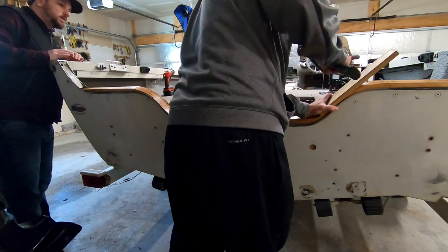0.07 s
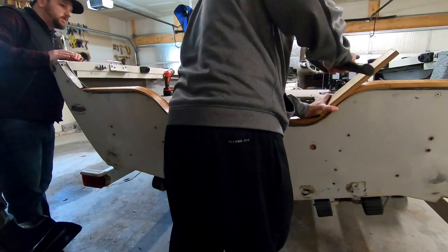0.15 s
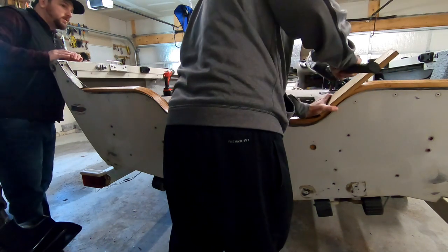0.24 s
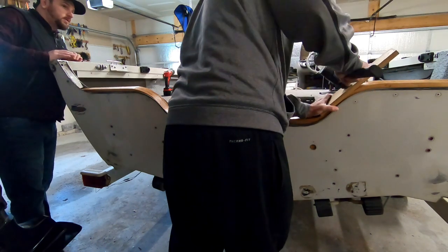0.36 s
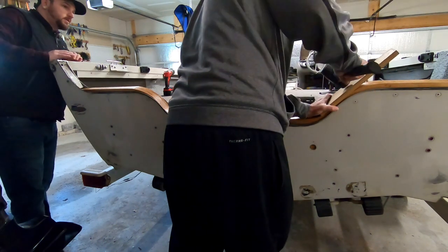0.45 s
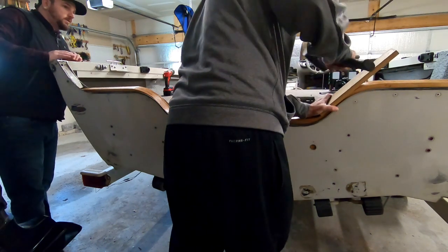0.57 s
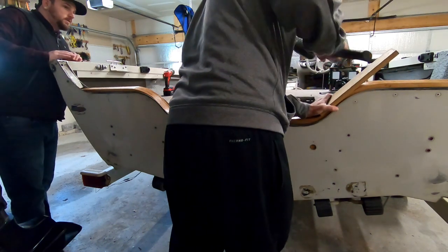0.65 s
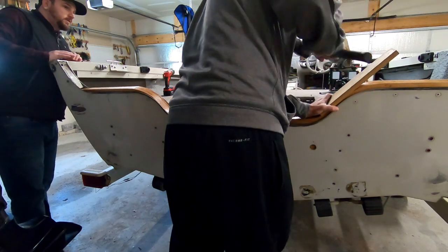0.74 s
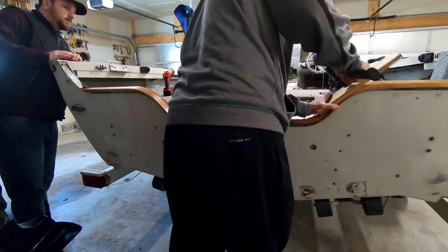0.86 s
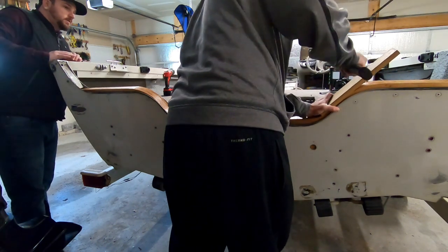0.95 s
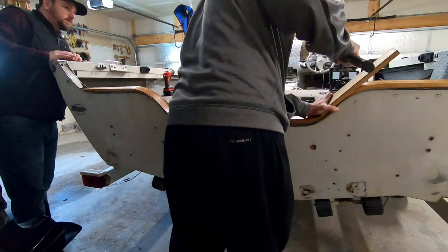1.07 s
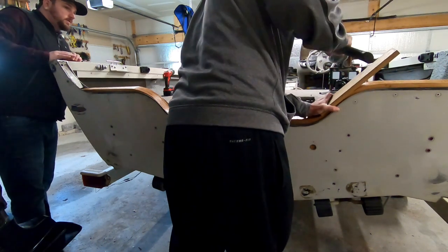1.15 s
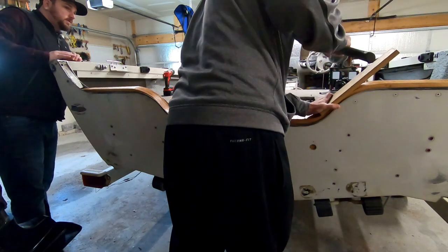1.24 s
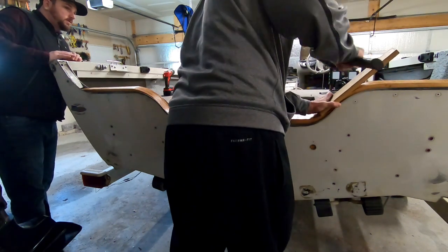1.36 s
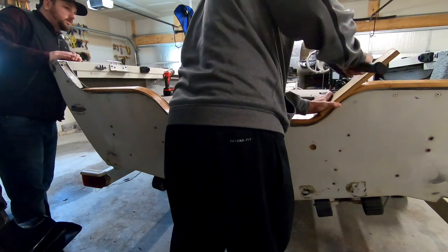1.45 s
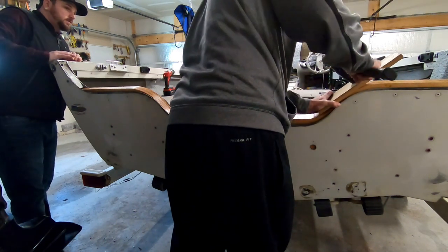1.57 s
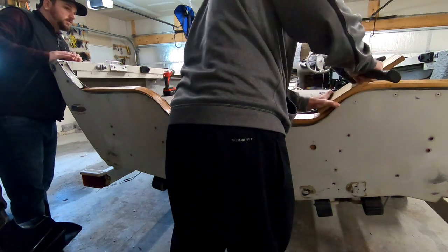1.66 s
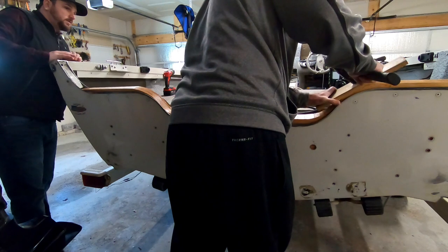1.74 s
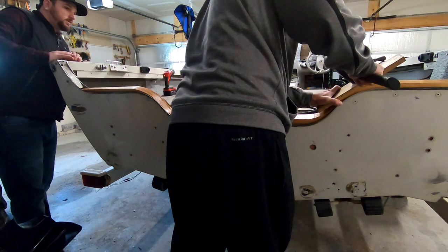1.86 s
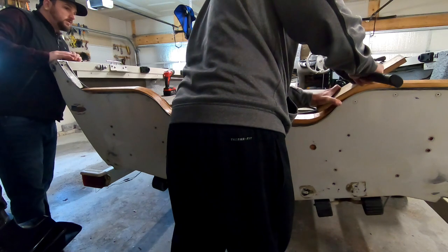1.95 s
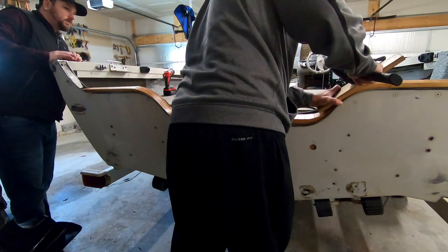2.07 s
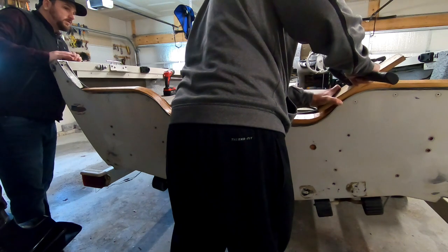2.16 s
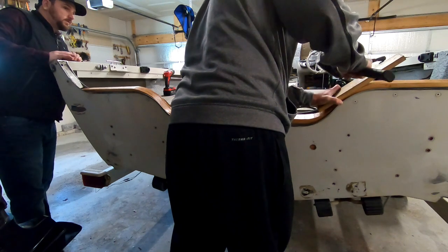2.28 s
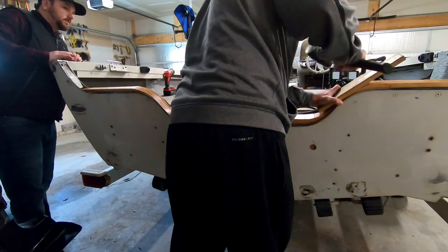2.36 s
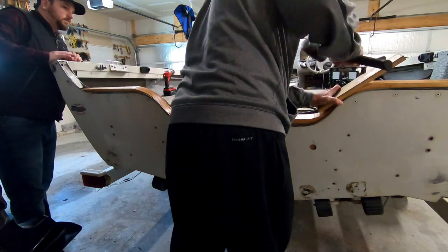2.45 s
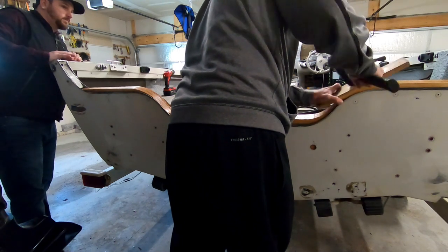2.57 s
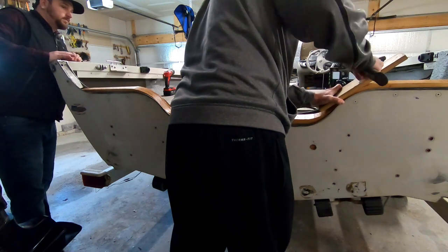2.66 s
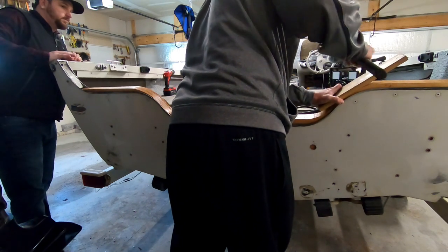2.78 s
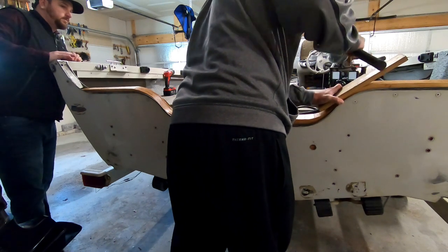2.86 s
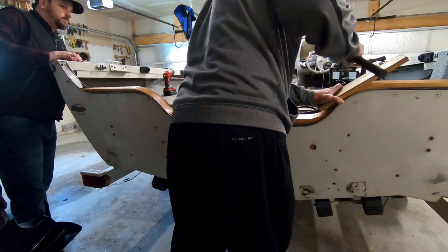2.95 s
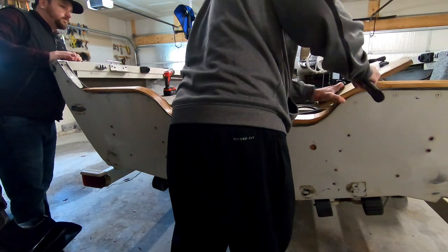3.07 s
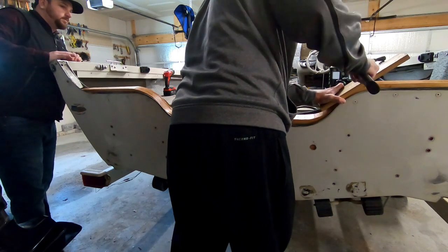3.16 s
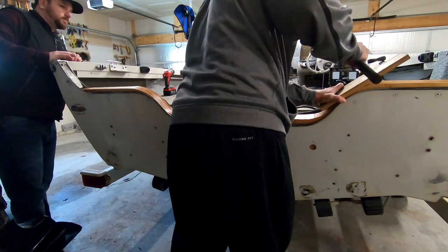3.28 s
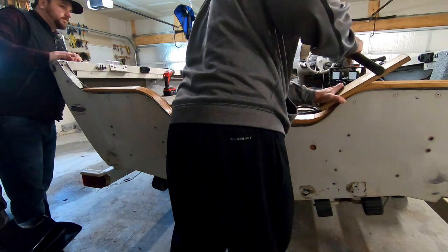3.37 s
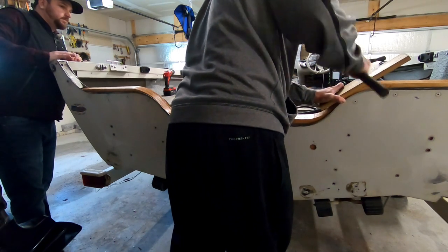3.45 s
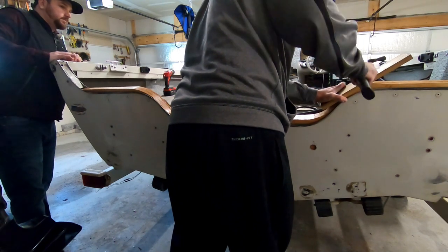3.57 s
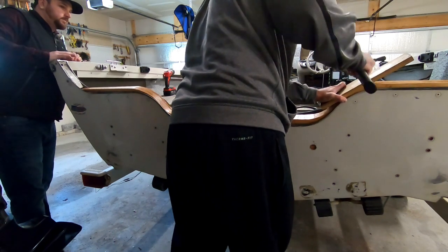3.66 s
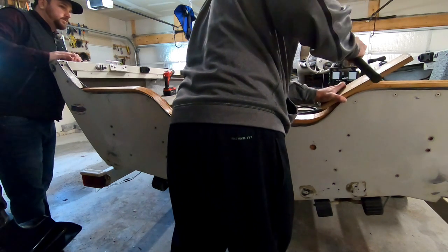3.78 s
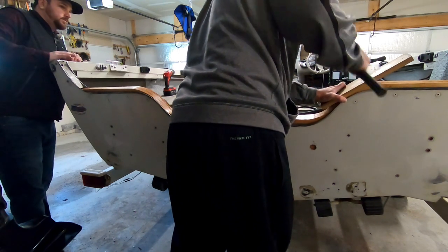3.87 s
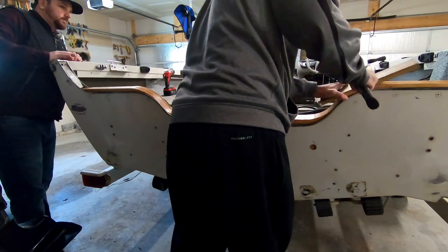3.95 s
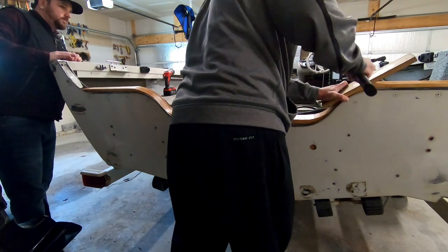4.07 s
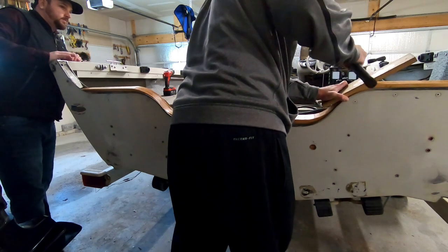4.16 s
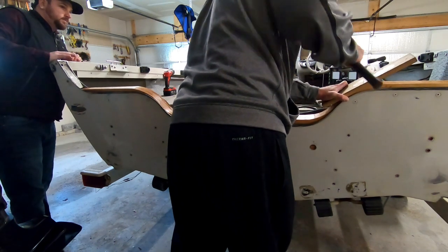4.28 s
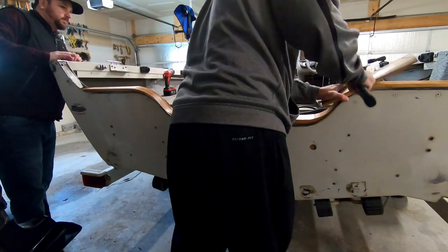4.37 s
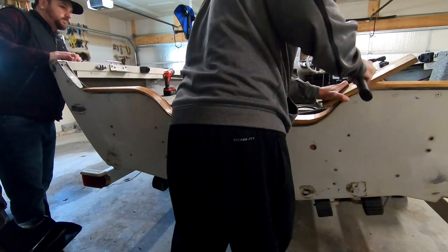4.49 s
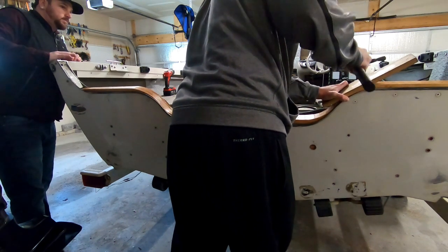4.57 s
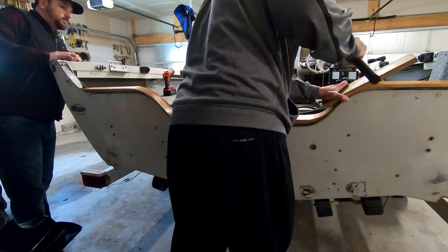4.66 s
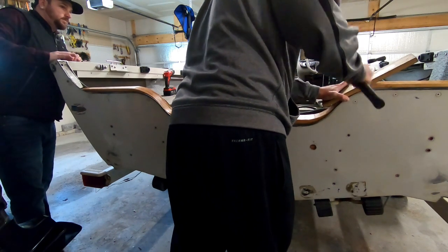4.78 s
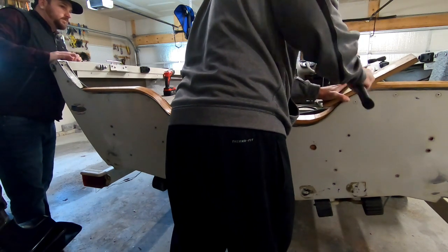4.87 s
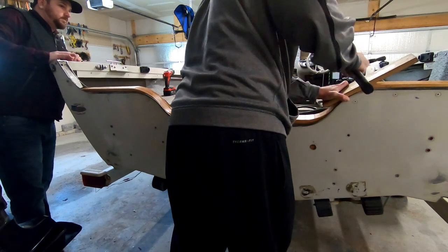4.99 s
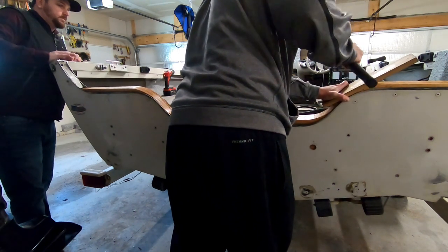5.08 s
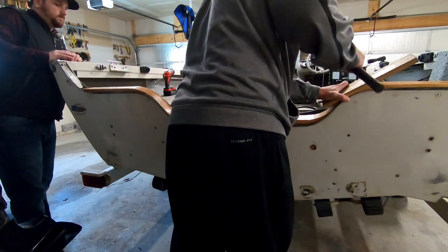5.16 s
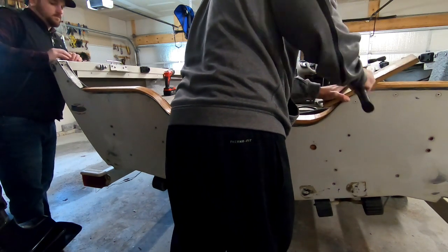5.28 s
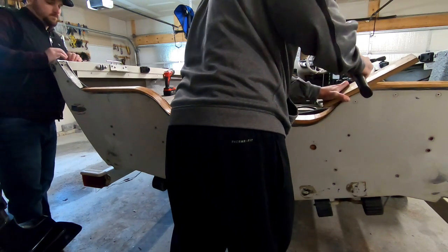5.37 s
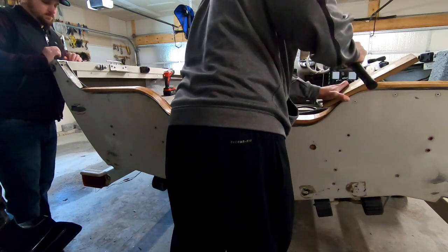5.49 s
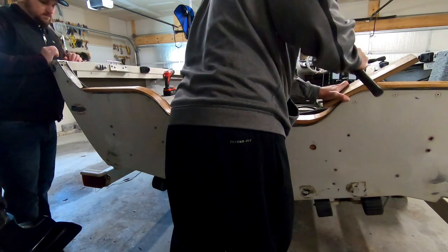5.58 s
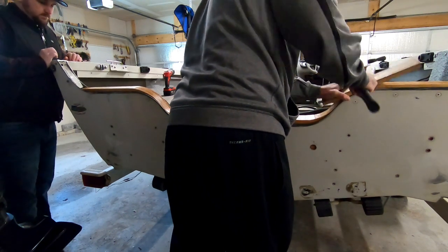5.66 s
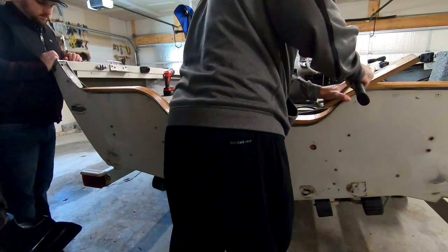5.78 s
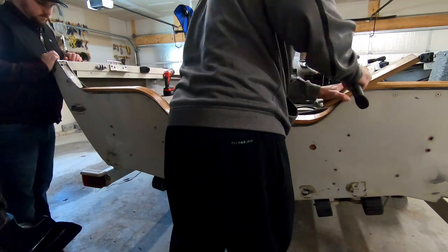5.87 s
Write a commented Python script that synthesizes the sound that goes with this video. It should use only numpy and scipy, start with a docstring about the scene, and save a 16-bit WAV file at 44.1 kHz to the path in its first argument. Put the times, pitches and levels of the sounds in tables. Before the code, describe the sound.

Loud close hammering on wood against a metal boat hull, ringing brightly at first, then turning to shorter, hollow knocks as the board seats.

```python
"""Hammer blows crack, boom and ring: plywood tapped into an aluminium boat hull in a garage, trial blows, then eight in rhythm.
Contact noise drives the board's resonances, sines make hull and thud, decaying noise bands make the clatter and the room.
As the board finally seats, its bright ring gives way to a shorter, hollow knock; small ticks, rubs and faint hiss join in.
The close microphone overloads on loud peaks; its gain control ducks, then lets the ringing swell over a faint rumble.
Early on the sound cuts out for a moment and returns with a dull thump."""
import sys
import numpy as np
from scipy import signal
from scipy.fft import rfft, irfft
from scipy.io import wavfile
from scipy.ndimage import uniform_filter1d, minimum_filter1d

SR = 44100
rng = np.random.default_rng(int(sys.argv[2]) if len(sys.argv) > 2 else 0)


def int16_out(signal):
    """Quantize to a 16-bit WAV file."""
    q = np.round(np.clip(np.atleast_2d(signal).T, -1, 1) * 32767)
    wavfile.write(sys.argv[1], SR, q.astype(np.int16))


N = 261513
TIME = np.arange(N) / SR
AGE = TIME[:int(1.3 * SR)]  # seconds since a blow or tick
BAND_HZ = 28 * 2 ** np.arange(0, 9.5, .5)  # half-octave centres


def undb(db):
    """Decibels to gain."""
    return 10 ** (np.asarray(db) / 20)


def fade(t60):
    """Exponential decay, 60 dB down after t60 seconds."""
    return np.exp(-np.log(1000) * AGE / max(t60, 1e-3))


def resonate(x, hz, width):
    """Two-pole resonance with gain 1 at its centre; centre and width in Hz are capped."""
    centre = min(hz, SR / 3)
    b, a = signal.iirpeak(centre, hz / min(width, SR / 4), fs=SR)
    return signal.lfilter(b, a, x)


def cut(x, hz, kind, order=2):
    """Butterworth low-pass or high-pass."""
    sos = signal.butter(order, min(hz, SR / 2 - 1), kind, fs=SR, output="sos")
    return signal.sosfilt(sos, x)


def band_noise(hz, size):
    """Half an octave of noise with soft edges, rms 1."""
    bin_hz = (np.arange(size // 2 + 1) + 1e-6) * SR / size
    octaves = np.log2(bin_hz / hz)
    window = np.cos(np.pi * np.clip(octaves, -.5, .5))
    x = irfft(rfft(rng.standard_normal(size)) * window, size)
    return x / x.std()


def bands(table):
    """Rows of a spectrum table read at every half octave, interpolated over log frequency."""
    hz, *columns = np.transpose(table)
    return zip(BAND_HZ, *(np.interp(np.log(BAND_HZ), np.log(hz), c) for c in columns))


def add(out, s, x):
    """Mix x into out from time s; whatever falls outside is dropped."""
    start = int(round(s * SR))
    x = x[max(-start, 0):max(len(out) - start, 0)]
    out[max(start, 0):max(start, 0) + len(x)] += x


def modes(table):
    """Decaying sines struck together; neighbours swing in opposite directions."""
    total = 0
    for k, (hz, db, t60) in enumerate(table):
        total = total + (-1) ** k * undb(db) * fade(t60) * np.sin(2 * np.pi * hz * AGE)
    return total


def dense_ring():
    """Countless panel modes and wall echoes: a quick loud clatter, and the slow decay of the garage."""
    # The dense ringing of boat and garage, before any damping by the board.
    # Each row: frequency in Hz, early level in dB, late level in dB, late t60 in seconds.
    ring_spectrum = [(40.5, -32, -21.5, 1.0), (101, 0, -18.5, 0.41), (219, -2, -21.5, 0.72),
                     (350, -2.5, -21, 0.9), (515, -10, -26.5, 0.87), (1020, -1, -21.5, 0.73),
                     (2240, -13, -25, 0.78), (3730, -15, -30, 0.7), (7560, -18.5, -35, 0.45),
                     (13760, -20.5, -37, 0.26)]
    early_t60_s = 0.11
    early, late = 0, 0
    for hz, early_db, late_db, t60 in bands(ring_spectrum):
        band = band_noise(hz, len(AGE))
        early = early + undb(early_db) * fade(early_t60_s) * band
        late = late + undb(late_db) * fade(t60) * band
    return np.array([early, late])


def seated(s, loose_and_seated):
    """A property of the board at time s, placed between its loose and seated values."""
    # How firmly the board is held, first by hand, then by the hull as the run of blows seats it.
    # Each row: time in seconds, firmness from 0 (loose) to 1 (seated).
    firmness = [(.43, 0.31), (1.0, 0.21), (2.7, 0.017), (3.2, 0.17), (5.0, 0.85)]
    held = np.interp(s, *np.transpose(firmness))
    return np.interp(held, (0, 1), loose_and_seated)


def hammer(wander_hz=1000, crack_hz=2300, crack_width_hz=2400, grit_db=-24):
    """Every blow drives the same boat and room; contact hardness and the seating of the board colour it."""
    # Hammer blows; the first starts before time zero, so only its later part is heard.
    # Each row: start in seconds, strength in dB, contact corner in Hz (higher = harder),
    # extra crack level in dB, tail level in dB.
    blows = [(-.18, -1.5, 1020, 10, -7.5), (0.432, -7, 887, 14, 5.5), (0.9893, -3, 4800, 4, -1),
             (1.682, -7.5, 960, -10.5, -11.5), (2.7011, -6.5, 5770, 7.5, -1.5), (3.1683, -6, 4100, 5.5, -2),
             (3.628, -6, 6240, 1, -1), (4.059, -4.5, 6800, -3.5, -2), (4.5070, -7.5, 6200, 6, 0),
             (4.9496, -8, 4600, 1, -2), (5.3781, -9, 4100, 1, -2.5), (5.7937, -10, 4950, 0, 0.5)]
    # Plywood resonances. Each row: frequency in Hz before the pitch ratio, width in Hz,
    # relative level in dB.
    board_modes = [(1560, 270, 6), (2938, 330, 5.5), (3640, 210, -1), (4840, 330, -7)]
    # The hollow knock. Each row: frequency in Hz, width in Hz, relative level in dB.
    knock_modes = [(468.4, 70, 1.5), (706, 99, 4), (3300, 380, -4)]
    # Hull panel modes. Each row: frequency in Hz, relative level in dB, t60 in seconds before damping.
    hull_modes = [(36.1, -36, 0.4), (54.07, -22.5, 0.8), (89.66, -19, 0.8), (112.6, -23.5, 0.93),
                  (136, -13.5, 0.21), (164.8, -5, 0.34), (178.6, -6.5, .46), (219, -11.5, 0.43),
                  (268.7, -16.5, 0.54), (348, -16, 0.51), (374.2, -17.5, 0.63), (417.5, -15.5, 0.58),
                  (487.7, -12, 0.34)]
    # The heavy thud of board against hull.
    # Each row: frequency in Hz, relative level in dB, t60 in seconds before damping.
    thud_modes = [(135.3, 6, 0.12), (175.9, 4.5, .16), (215.9, 2, 0.16), (353, -2.5, 0.15),
                  (443.3, -6.5, 0.038), (501.3, -0.5, 0.097)]
    # what seating changes: (loose, seated)
    board_pitch = (1.046, 0.962)  # ratio
    board_db, knock_db = (-0.5, -11.5), (-18, 8)  # free plywood ring, hollow knock
    damping_db_per_s = (-7, 20.5)  # joined by the linger damping, the sum never below 0
    build_s = (0.042, 0.004)  # time for the tail to spread through hull and room
    # a soft blow lingers on the board and damps it, in proportion to its contact time
    linger_db_per_s, linger_hz = 11.5, 1070  # damping at this contact corner
    crack_t60_s, base_crack_db = 0.0079, 21
    # the low boom swells once more
    surge_delay_s, surge_rise_s, surge_db, surge_top_hz = 0.098, 0.019, -6.5, 562

    out, ring = np.zeros(N), dense_ring()
    hull, thud = modes(hull_modes), modes(thud_modes)
    for s, db, contact_hz, crack_db, tail_db in blows:
        pitch = seated(s, board_pitch)
        damping = seated(s, damping_db_per_s) + linger_db_per_s * linger_hz / contact_hz
        # the head never lands on quite the same spot: long waves repeat, short ones differ
        early, late = cut(ring, wander_hz, "low") + cut(dense_ring(), wander_hz, "high")
        # the first crack comes straight from the board
        crack_noise = resonate(rng.standard_normal(len(AGE)), crack_hz * pitch, crack_width_hz)
        crack = fade(crack_t60_s) * crack_noise
        tail = late * (1 - np.exp(-AGE / max(seated(s, build_s), 1e-3)))
        body = undb(base_crack_db + crack_db) * crack + early + undb(tail_db) * tail
        board = sum(undb(mode_db) * resonate(body, hz * pitch, width) for hz, width, mode_db in board_modes)
        knock = sum(undb(mode_db) * resonate(body + thud, hz, width) for hz, width, mode_db in knock_modes)
        blow = body + thud + undb(min(tail_db, 0)) * hull
        blow = blow + undb(seated(s, board_db)) * board + undb(seated(s, knock_db)) * knock
        surge = cut(early, surge_top_hz, "low", order=4) * (1 - np.exp(-AGE / surge_rise_s))
        add(blow, surge_delay_s, undb(tail_db + surge_db) * surge)
        # a softer contact lasts longer and leaves the treble out, all but a little from the rough wood grain
        blow = cut(blow, contact_hz, "low") - undb(grit_db) * blow
        add(out, s, undb(db - max(damping, 0) * AGE) * blow)
    return out


def ticks_and_rubs(rough=0.28):
    """Filtered noise: small decaying ticks, grainy rubs and faint steady hiss."""
    # Small ticks. Each row: start in seconds, level in dB before gain control,
    # centre in Hz, width in Hz, t60 in seconds.
    ticks = [(2.182, -61.5, 254, 119.2, 0.21), (2.623, -62.5, 6500, 7000, 0.021)]
    # Rubs and faint hisses, some running on under the blows. Each row: start in seconds, end in seconds,
    # level in dB before gain control, centre in Hz, width in Hz of each of two filter passes (capped).
    rubs = [(-.1, 0.43, -72.5, 4170, 12000), (0.26, 0.45, -55, 1900, 2000), (-.1, 0.948, -71.5, 4170, 1800),
            (0.51, 2.1, -82, 3500, 3700), (1.84, 1.926, -76.5, 4600, 6000)]
    out = np.zeros(N)
    for s, db, hz, width, t60 in ticks:
        tick = resonate(rng.standard_normal(len(AGE)), hz, width)
        add(out, s, undb(db) * fade(t60) * tick / tick.std())
    for start, end, db, hz, width in rubs:
        # a random level for every 128 samples makes the grain
        grain_level = np.repeat(rng.standard_normal(N // 128 + 1), 128)[:N]
        grains = rng.standard_normal(N) * np.exp(rough * grain_level)
        rub = resonate(resonate(grains, hz, width), hz, width)
        span = uniform_filter1d(1. * ((TIME > start) & (TIME < end)), size=1800)
        out += undb(db) * rub / rub.std() * span
    return out


def garage():
    """A faint, rumbling background of steady noise bands."""
    # Garage background. Each row: frequency in Hz, level in dB a half octave before gain control.
    floor_spectrum = [(25, -64), (55, -69.5), (110, -71.5), (400, -83), (900, -82), (2000, -86),
                      (5000, -90), (15000, -94)]
    return sum(undb(db) * band_noise(hz, N) for hz, db in bands(floor_spectrum))


def scene():
    """Blows, ticks, rubs and background at one microphone."""
    return (hammer() + ticks_and_rubs() + garage())[None]


def gain_control(x, rest_db=12, hold_s=0.011, release_db_per_s=150):
    """Looks a little ahead, ducks on a peak, holds, then climbs back at a steady rate."""
    ceiling_db, attack_s, ahead = -7.3, .0052, int(.008 * SR)
    peak_db = 20 * np.log10(np.abs(np.pad(x[ahead:], (0, ahead))) + 1e-9)
    duck_db = np.maximum(peak_db + rest_db - ceiling_db, 0)
    half = int(hold_s * SR / 2)
    held_db = -minimum_filter1d(-duck_db, 2 * half + 1, origin=half)
    climb_db = release_db_per_s * TIME
    released_db = np.maximum.accumulate(held_db + climb_db) - climb_db
    smooth_duck_db = cut(released_db, 1 / (2 * np.pi * attack_s), "low", order=1)
    return x * undb(rest_db - smooth_duck_db)


def dropout(x, thump_db=-7, thump_width_s=0.0023):
    """The sound cuts out for a moment and comes back with a dull thump, a high-passed bell-shaped pulse."""
    gap_from_s, gap_to_s, thump_at_s = 1.049, 1.074, 1.0755
    live = 1 - uniform_filter1d(1. * ((TIME > gap_from_s) & (TIME < gap_to_s)), size=100)
    thump = undb(thump_db) * np.exp(-((TIME - thump_at_s) / thump_width_s) ** 2)
    return x * live + cut(thump, 30, "high")


def record(dry):
    """The microphone clips, gain control follows; a shallow treble dip, and deep bass and the top are cut."""
    dip_hz, dip_width_hz, dip_db = 7800, 3900, -2.5
    clipped = dry[0] / (1 + dry[0] ** 8) ** (1 / 8)  # nearly linear, then a firm limit at 1
    x = cut(gain_control(clipped), 42, "high", order=1)
    x = dropout(x)
    x = x - (1 - undb(dip_db)) * resonate(x, dip_hz, dip_width_hz)
    x = cut(x, 16000, "low")
    # steep top edge at 16.5 kHz
    return signal.sosfilt(signal.ellip(8, .2, 70, 16500, fs=SR, output="sos"), x)[None]


dry = scene()
out = record(dry)
int16_out(out)
```